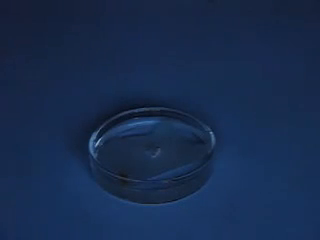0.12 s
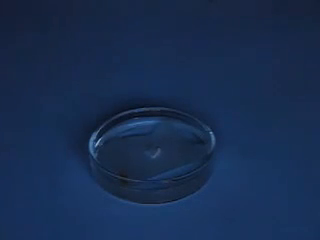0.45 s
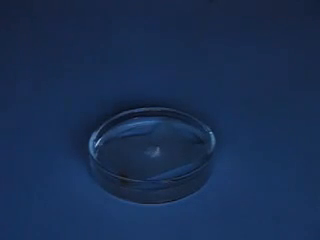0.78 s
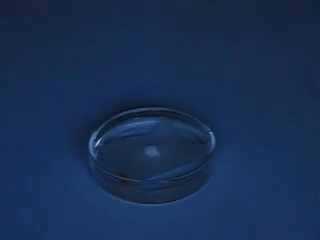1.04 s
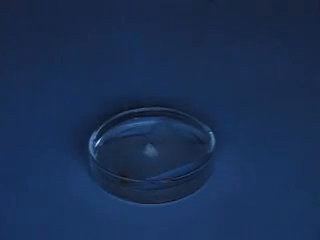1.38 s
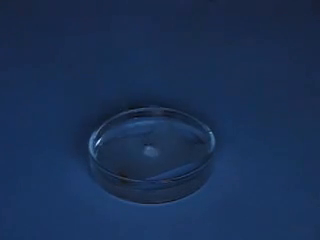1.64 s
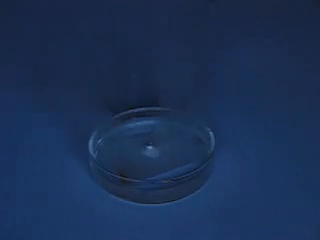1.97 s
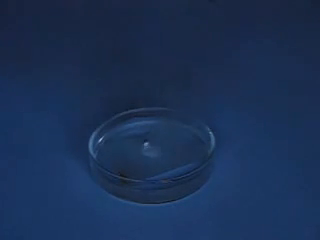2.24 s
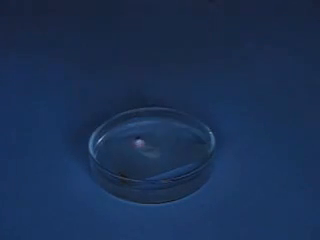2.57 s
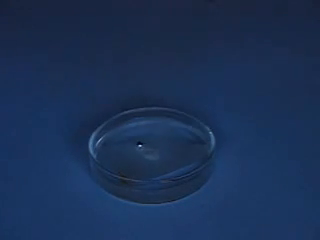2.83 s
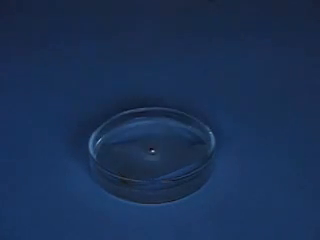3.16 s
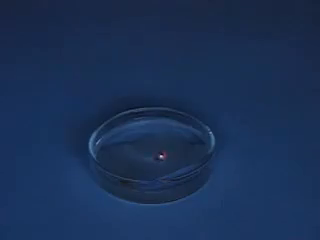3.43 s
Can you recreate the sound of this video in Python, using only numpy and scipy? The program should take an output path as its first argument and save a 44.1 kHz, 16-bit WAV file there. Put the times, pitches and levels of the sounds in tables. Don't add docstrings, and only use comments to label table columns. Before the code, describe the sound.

Bright bubbly sizzling from reacting metal on water builds with a thin glassy whistle, peaks, cuts back, gives a tiny pop and a weaker surge, over throbbing motor hum and air noise in a hard-walled room.

```python
import sys
import numpy as np
from scipy import signal
from scipy.fft import rfft, irfft
from scipy.io import wavfile
from scipy.ndimage import uniform_filter1d

SR = 44100
rng = np.random.default_rng(int(sys.argv[2]) if len(sys.argv) > 2 else 0)


def inscribe(sig):
    pcm = np.round(np.clip(np.atleast_2d(sig).T, -1, 1) * 32767)
    wavfile.write(sys.argv[1], SR, pcm.astype(np.int16))


def invert_db(x):
    u = np.asarray(x, float) / 20
    return 10 ** u


N = 159201
T = np.arange(N) / SR

# (time [s], fizz level [dB], dish whistle level [dB], commonest bubble pitch [Hz])
VIGOUR = [(0, -53, -66.5, 3980), (1.12, -52, -64.5, 3960), (1.33, -48.5, -50, 4000),
          (1.64, -47.5, -59.5, 4600), (1.69, -42.5, -59.5, 3320), (1.78, -41.5, -57, 3260),
          (1.92, -43.5, -56.5, 3880), (2.22, -39, -51, 2990), (2.32, -40.5, -60.5, 3710),
          (2.53, -39, -62, 3370), (2.615, -35, -57.5, 3850), (2.7, -40.5, -65.5, 3430),
          (2.785, -45.5, -72, 4740), (2.82, -55, -68.5, 4060), (3.03, -48.5, -68.5, 3890),
          (3.22, -43.5, -56.5, 3790), (3.515, -48, -58.5, 3980), (3.55, -60.5, -69, 4010)]


def level(x, db):
    return x * invert_db(db) / np.sqrt(np.mean(x ** 2))


def curve(table, axis):
    return np.interp(T, np.array(table)[:, 0], np.array(table)[:, axis])


def colour(x, points):
    hz = np.arange(N // 2 + 1) * SR / N + 1
    point_hz, point_db = np.array(points, float).T
    gain_db = np.interp(np.log(hz), np.log(point_hz), point_db, left=-120, right=-120)
    return irfft(rfft(x) * invert_db(gain_db), N)


def ring(x, hz, width_hz):
    b, a = signal.iirpeak(hz, hz / max(width_hz, 1), fs=SR)
    return signal.lfilter(b, a, x)


def walk(rate_hz):
    hold = int(SR / rate_hz)
    steps = np.repeat(rng.standard_normal(N // hold + 1), hold)
    smooth = uniform_filter1d(uniform_filter1d(steps, hold), hold)
    return 1.3 * smooth[:N]


def noise():
    return rng.standard_normal(N)


def bubbles():
    classes, bursts_per_s, cycles = 14, 9000, 2.6
    burst_spread_db, sputter_db = 1.3, 0.5
    favour_peak_db, favour_octaves = 5, 0.3
    common_hz = curve(VIGOUR, axis=3)
    shared_sputter = walk(14)
    swarm = 0
    for hz in np.geomspace(700, 7000, classes):
        chance = rng.random((2, N))
        struck = chance[0] < bursts_per_s / classes / SR
        bursts = struck * invert_db(-burst_spread_db * np.log(1 - chance[1]))
        grains = ring(ring(bursts, hz, hz / cycles), hz, hz / cycles)
        octaves_off = np.log2(hz / common_hz)
        favour_db = favour_peak_db * np.exp(-0.5 * (octaves_off / favour_octaves) ** 2)
        gain_db = favour_db + sputter_db * (shared_sputter + walk(11))
        swarm = swarm + invert_db(gain_db) * level(grains, 0) * np.sqrt(hz)
    return swarm


def dish_rings(swarm):
    # (frequency [Hz], width [Hz], level [dB])
    modes = [(2160, 38, -7), (2360, 34, -6), (2620, 75, -6), (3040, 77, 0), (3270, 47, -3), (3490, 68, -2),
             (3880, 59, 0), (4120, 77, -3), (4340, 36, -4), (4540, 75, -6), (4970, 39, -6), (5170, 43, -6),
             (5850, 40, -12)]
    wander_db = 2.5
    rings = 0
    for hz, width_hz, db in modes:
        rings = rings + invert_db(db + wander_db * walk(3.6)) * ring(swarm, hz, width_hz)
    return level(rings, -7.5)


def spits():
    # (time [s], decay [s], level [dB])
    puffs = [
        (.495, .025, -49),
    ]
    hz, width_hz = 2300, 2200
    spray = level(ring(ring(noise(), hz, width_hz), hz, width_hz), 0)
    out = 0
    for start_s, decay_s, db in puffs:
        out = out + spray * invert_db(db) * (T > start_s) * np.exp(-np.abs(T - start_s) / decay_s)
    return out


def fizz():
    # (frequency [Hz], density [dB per Hz])
    burst_colour = [(600, -15), (1200, -3), (2000, -3.5), (2700, -1), (3200, -1.5), (4200, -3.5),
                    (5400, -2.5), (7450, -12.5)]
    # (time [s], half length [s], gain [dB])
    surges = [
        (1.98, 0.022, 3),
        (2.385, .025, 1),
        (2.5, .02, 2.5),
        (2.62, 0.023, 2),
        (2.94, 0.0037, 5),
        (3.24, 0.012, 1),
        (3.5, .02, 3),
    ]
    swarm = level(colour(bubbles(), burst_colour), 0)
    surge_db = 0
    for centre_s, half_s, db in surges:
        surge_db = surge_db + db * np.exp(-0.5 * ((T - centre_s) / half_s) ** 2)
    body = level(swarm + dish_rings(swarm), 0) * invert_db(curve(VIGOUR, axis=1) + surge_db)
    whistle = level(ring(swarm, hz=3890, width_hz=130), 0) * invert_db(curve(VIGOUR, axis=2))
    return body + whistle + spits()


def room(x):
    t60_s, tail_db, wander_s = 0.25, -4, 0.45
    t = T[:SR // 4]
    wet = 0
    for centre_s in np.arange(0, 4, wander_s):
        decay = 1000 ** (-t / t60_s) * (t > 0.002)
        tail = level(rng.standard_normal(len(t)) * decay, tail_db) / np.sqrt(len(t))
        here = np.cos(np.pi / 2 * np.clip((T - centre_s) / wander_s, -1, 1))
        wet = wet + signal.fftconvolve(x * here, tail)[:N]
    return level(x + wet, 0) * np.std(x)


def motors():
    # (time [s], firing frequency [Hz], level [dB])
    slowing = [(0.0, 57.1, -37.5), (0.4, 59.58, -30.6), (0.8, 59.49, -28.9), (1.2, 59.17, -29.7),
               (1.6, 59.11, -28.3), (2.01, 58.82, -31.0), (2.41, 58.05, -27.8), (2.81, 57.27, -24.9),
               (3.21, 56.64, -25.4), (3.61, 55.91, -27.0)]
    # (time [s], firing frequency [Hz], level [dB])
    quickening = [(0.0, 63.61, -27.9), (0.4, 64.62, -26.0), (0.8, 63.97, -31.5), (1.2, 64.51, -35.8),
                  (1.6, 64.67, -28.6), (2.01, 65.48, -30.2), (2.41, 65.4, -37.2), (2.81, 66.21, -31.9),
                  (3.21, 67.55, -41.0), (3.61, 68.01, -34.4)]
    # (motor [0 slowing, 1 quickening], order [x firing], level [dB], fade [dB per s], smear [Hz])
    orders = [
        (1, 2, -39.5, -2.5, 1.1),
        (1, 2 / 3, -41, 1.5, 1.56),
        (0, 1 / 2, -49.5, 1.5, 2),
    ]
    phases, hum = [], 0
    for motor in (slowing, quickening):
        phase = 2 * np.pi * np.cumsum(curve(motor, axis=1)) / SR
        phases.append(phase)
        hum = hum + invert_db(curve(motor, axis=2)) * np.cos(phase)
    for motor, order, db, fade_db_per_s, smear_hz in orders:
        smear = 2 * np.pi * np.cumsum(smear_hz * walk(12)) / SR
        gain = invert_db(db + fade_db_per_s * T + 1.4 * walk(4))
        hum = hum + gain * np.cos(order * phases[round(motor)] + smear)
    return np.sqrt(2) * hum


def air_rush():
    # (frequency [Hz], density [dB per Hz])
    air_colour = [(250, -20.5), (330, -5.5), (400, -3), (700, 0), (1120, -2), (1270, -8.5), (2200, -15),
                  (7300, -31)]
    swell_db, flicker_db = 0.3, 0.6
    swell = walk(2.3)
    rush = 0
    for hz in 350 * 2 ** np.arange(0, 4.6, 0.5):
        rush = rush + invert_db(swell_db * swell + flicker_db * walk(6.19)) * ring(noise(), hz, hz / 2)
    spectrum = rfft(rush)
    power = uniform_filter1d(np.abs(spectrum) ** 2, size=400)
    flat = irfft(spectrum / np.sqrt(power), N)
    return level(colour(flat, air_colour), -42)


def ventilation():
    # (frequency [Hz], density [dB per Hz])
    rumble_colour = [(14, -29), (25, 3), (48, -5.5), (72, -7.5), (115, -17.5), (150, -13.5), (220, -20),
                     (330, -28)]
    # (frequency [Hz], width [Hz], level [dB])
    duct_modes = [(192.2, 6.8, -43), (241.2, 8, -47), (274.4, 23, -59.5), (297.4, 22, -53.5),
                  (671, 2, -58.5), (719, 3.1, -65), (1830, 19, -61.5)]
    # (time [s], gain [dB])
    flow = [(0, 0.5), (1.2, 0), (1.6, 1), (2.0, 1), (2.4, 2), (2.85, 2), (3.2, 1.5), (3.61, 3)]
    rumble = level(colour(noise(), rumble_colour), -31)
    ducts = sum(level(ring(noise(), hz, width_hz), db) for hz, width_hz, db in duct_modes)
    return rumble + (air_rush() + ducts) * invert_db(curve(flow, axis=1))


def scene():
    fade_in_s = 0.012
    mix = room(fizz()) + motors() + ventilation()
    return (mix * np.minimum(T / fade_in_s, 1))[None]


def top_cut(x):
    return signal.sosfilt(signal.butter(12, 11000, fs=SR, output="sos"), x)


def record(dry):
    top_hz, hiss_db, offset = 5830, -94, 0.0245
    low_pass = signal.butter(10, top_hz, fs=SR, output="sos")
    dull = signal.sosfilt(low_pass, dry) + level(noise(), hiss_db)
    return top_cut(dull + offset)


dry = scene()
out = record(dry)
inscribe(out)
```